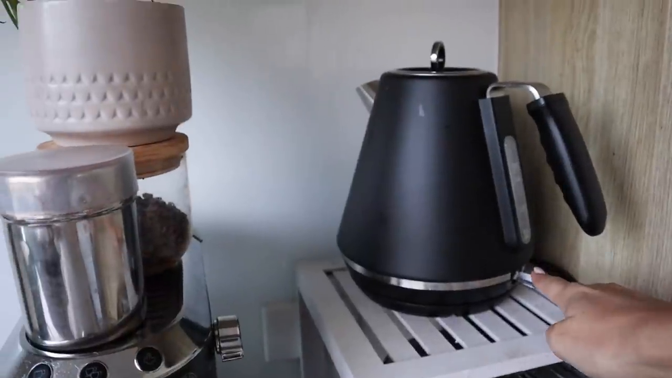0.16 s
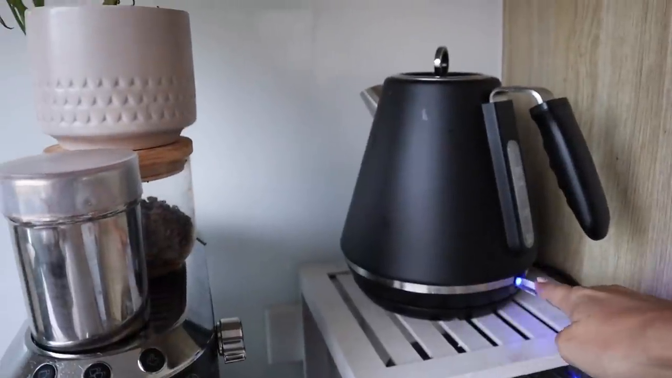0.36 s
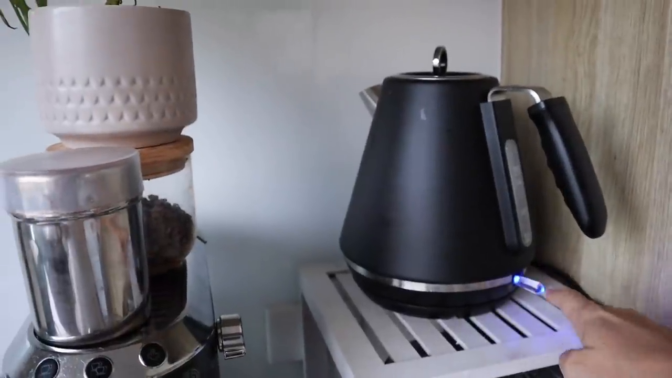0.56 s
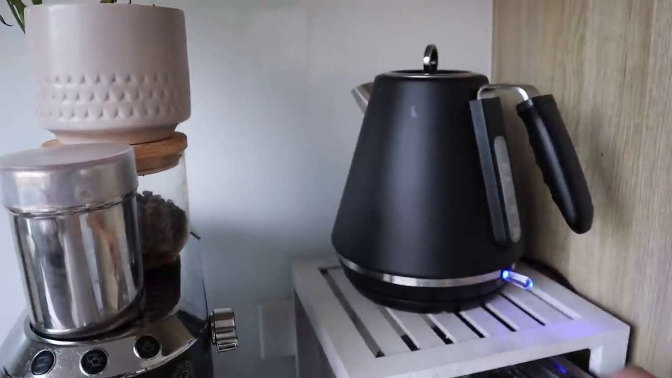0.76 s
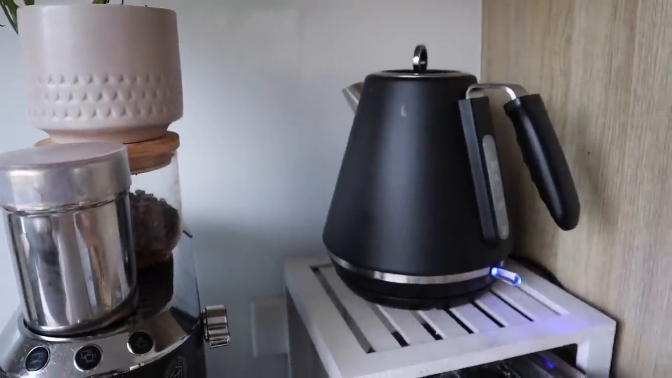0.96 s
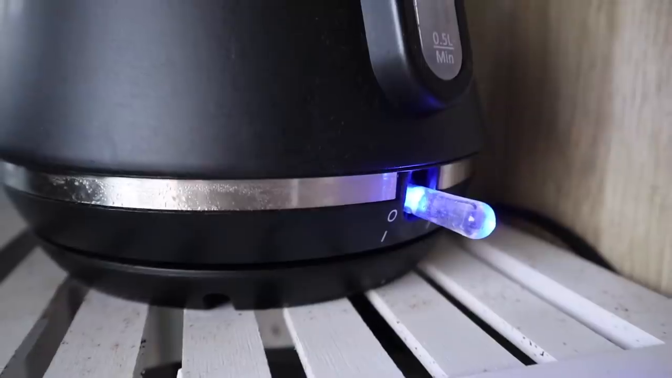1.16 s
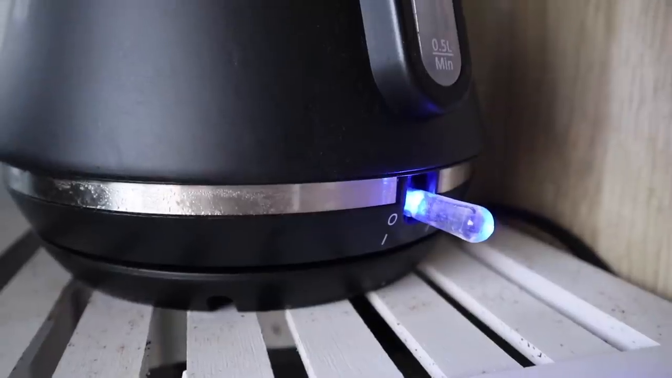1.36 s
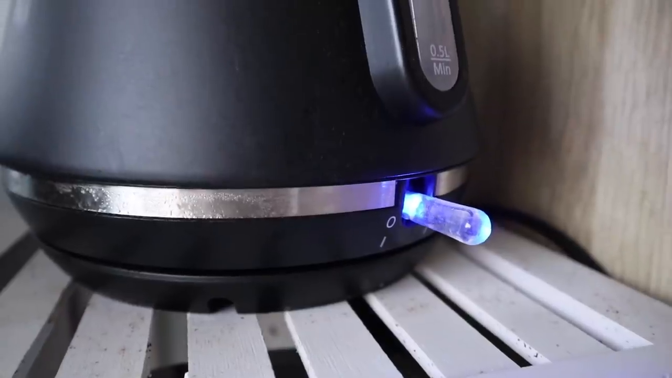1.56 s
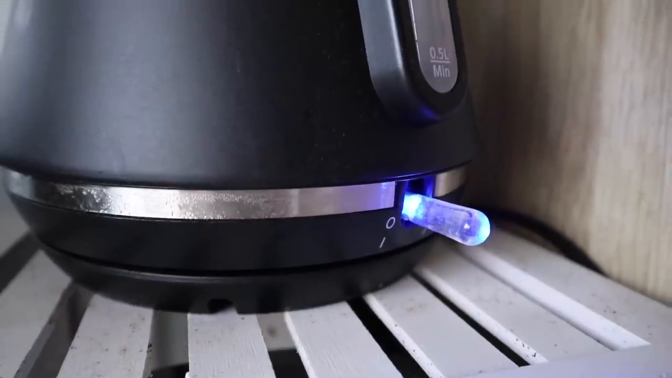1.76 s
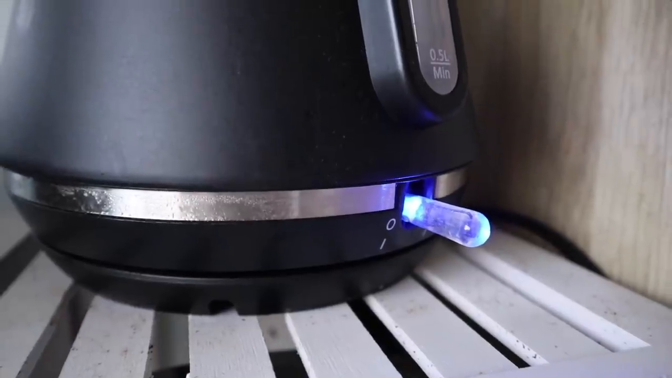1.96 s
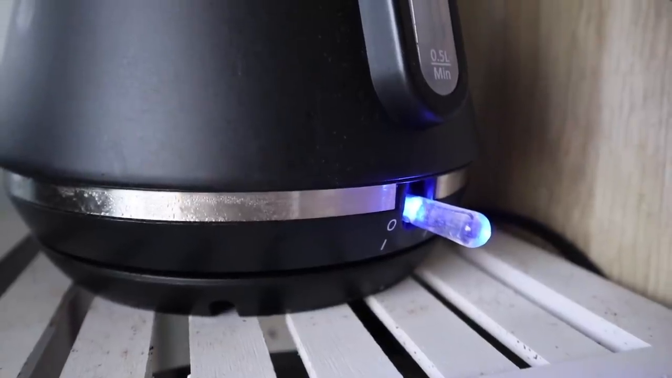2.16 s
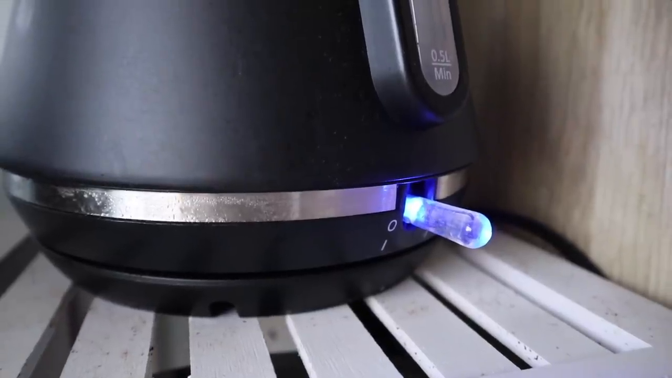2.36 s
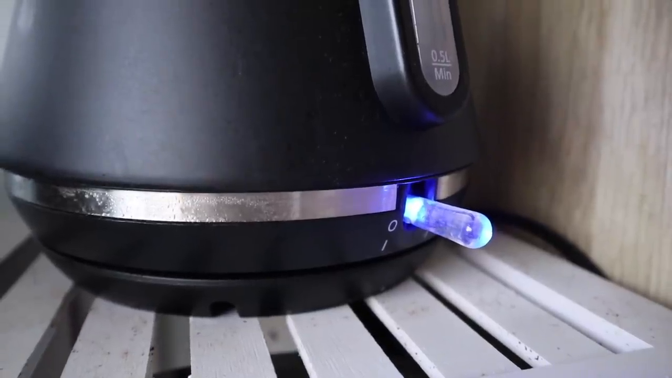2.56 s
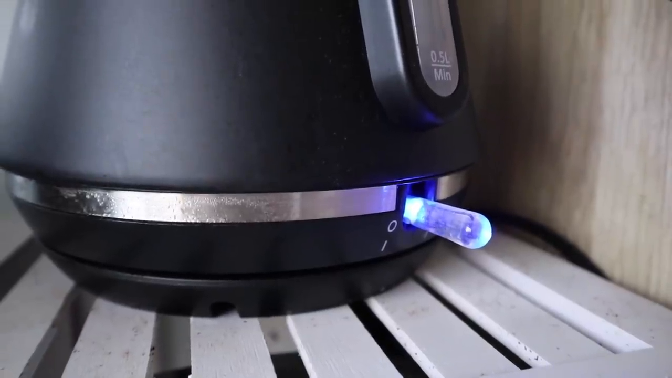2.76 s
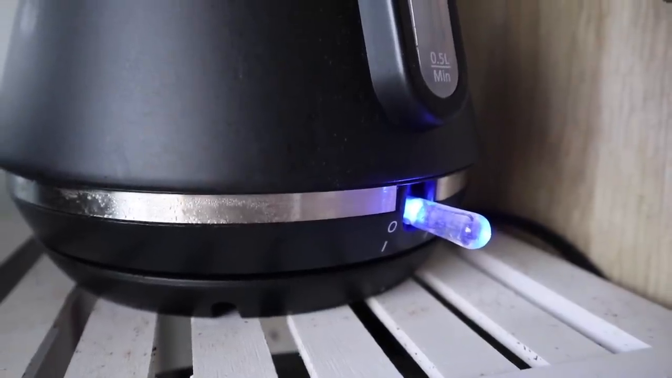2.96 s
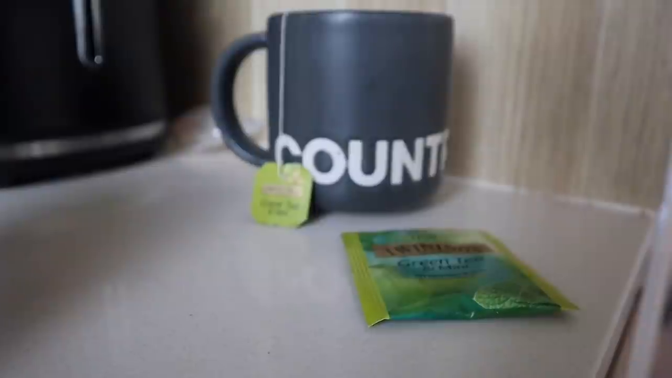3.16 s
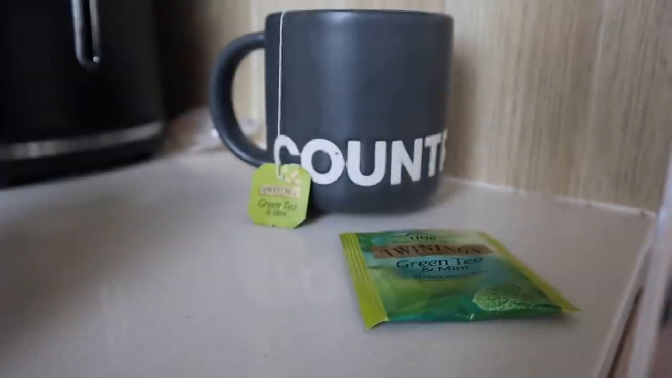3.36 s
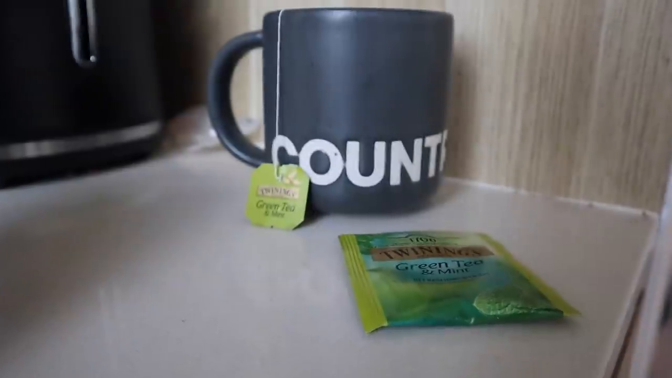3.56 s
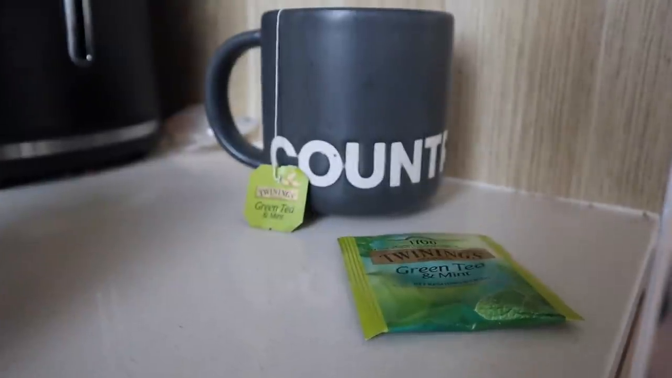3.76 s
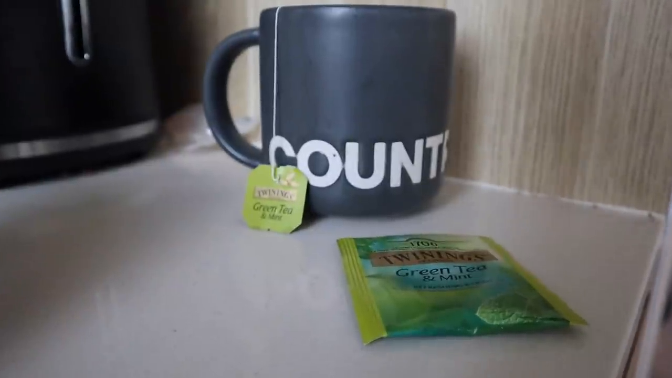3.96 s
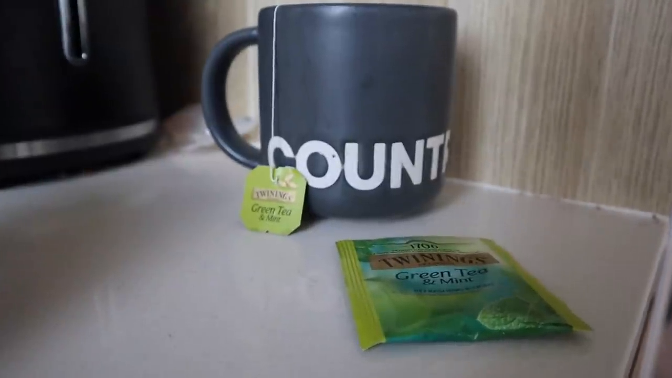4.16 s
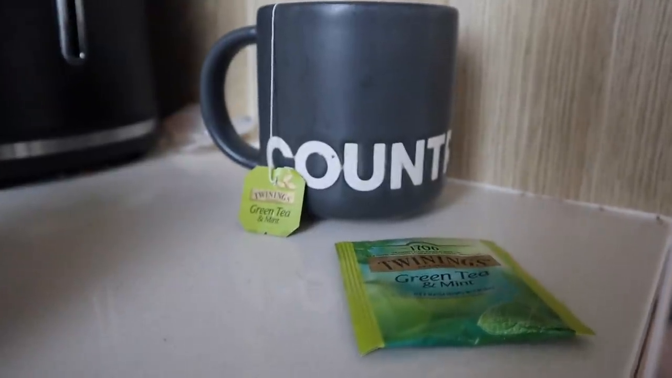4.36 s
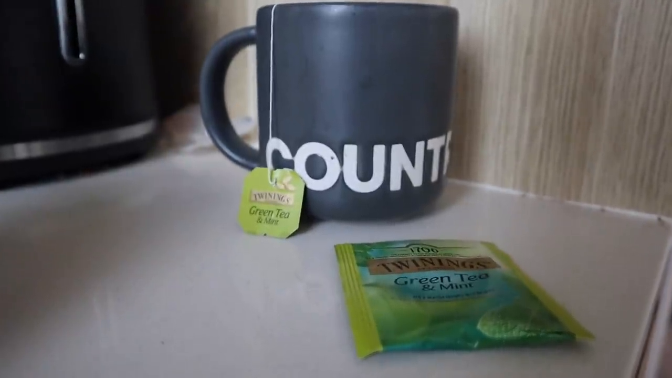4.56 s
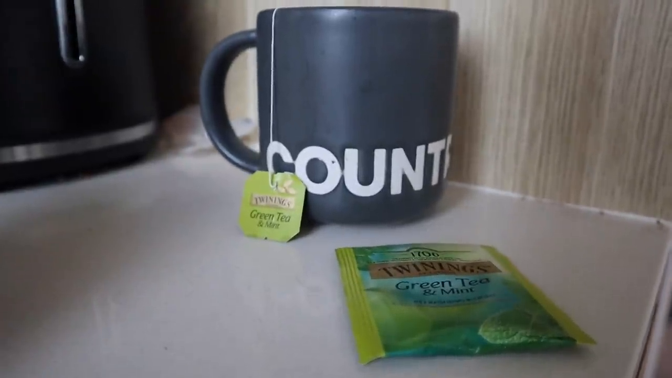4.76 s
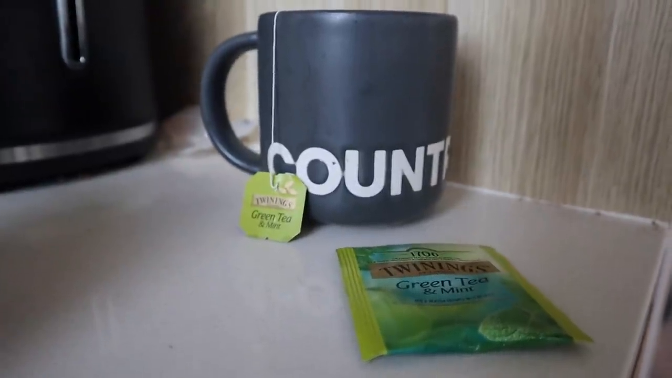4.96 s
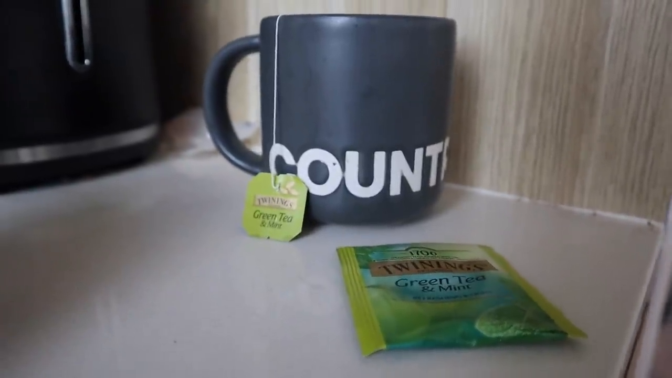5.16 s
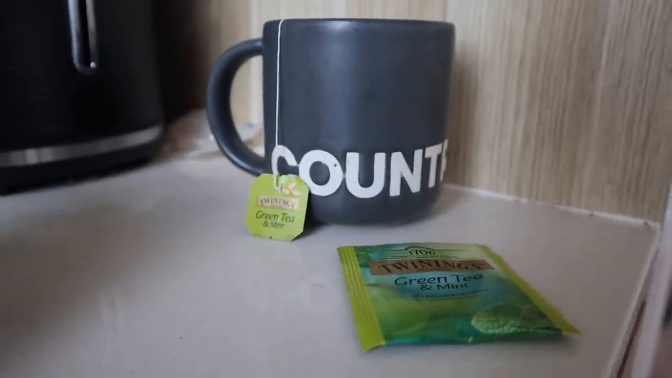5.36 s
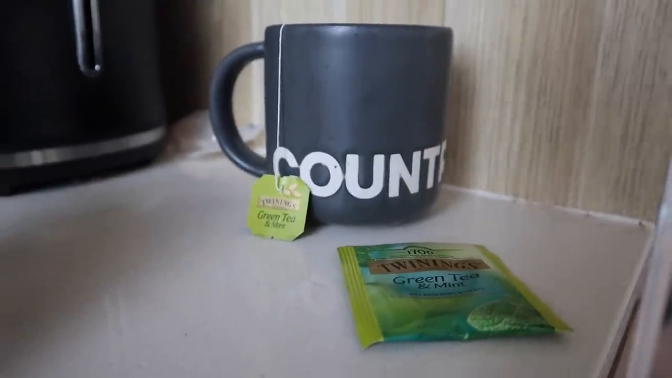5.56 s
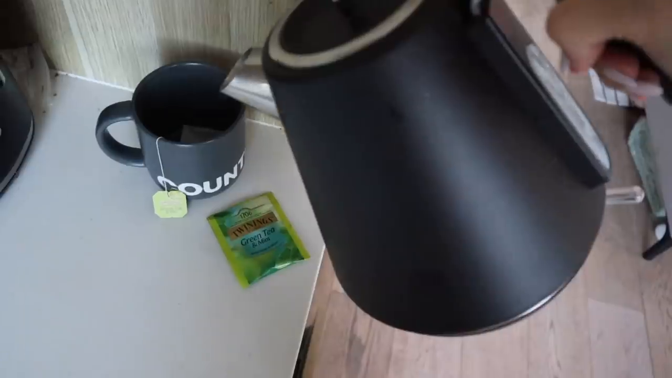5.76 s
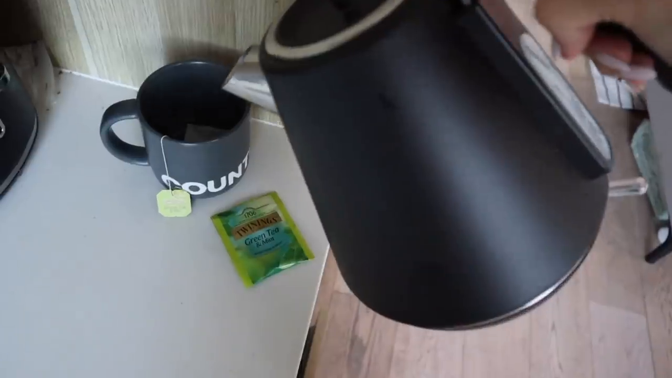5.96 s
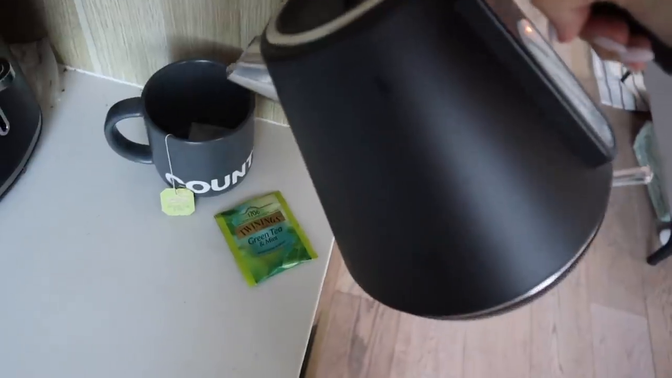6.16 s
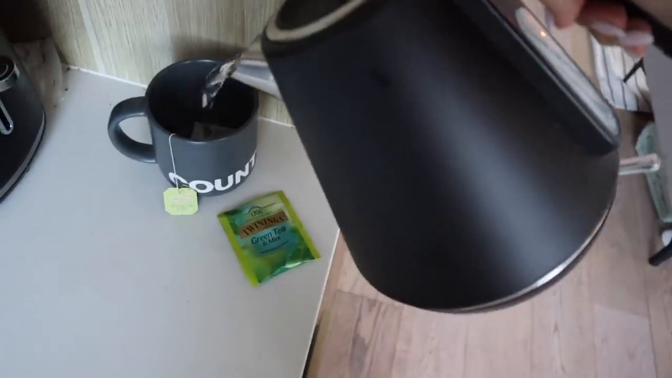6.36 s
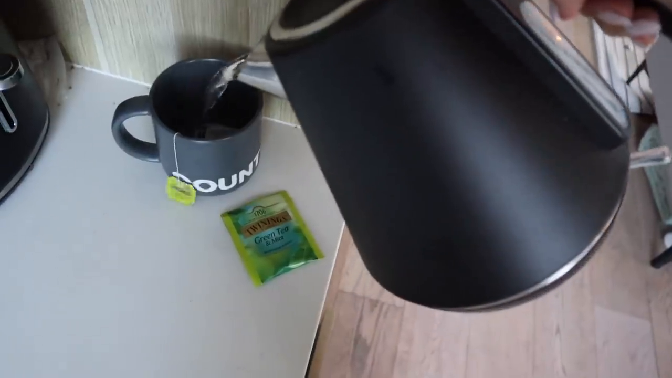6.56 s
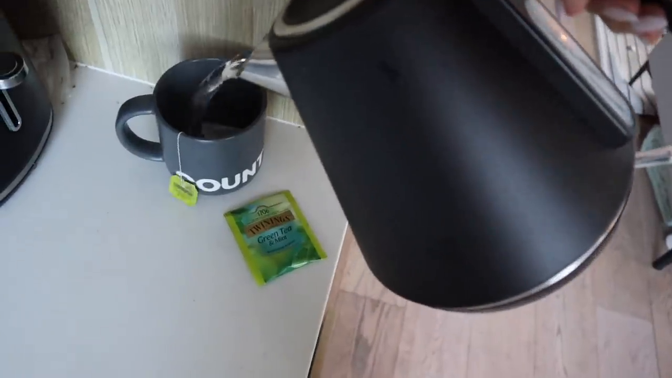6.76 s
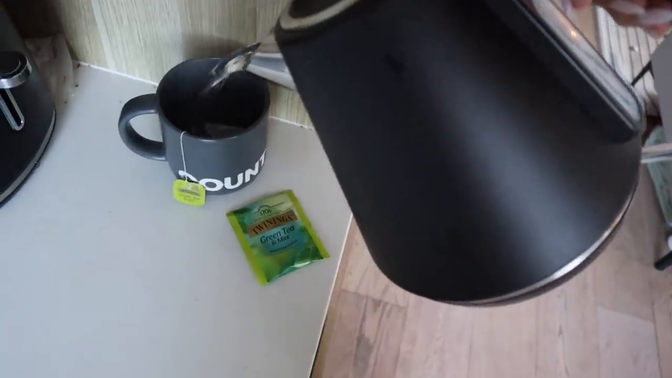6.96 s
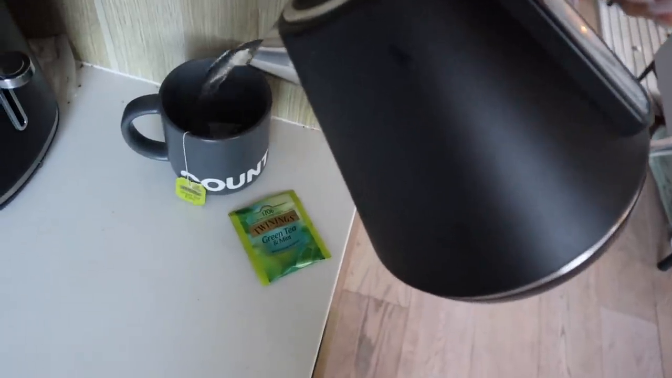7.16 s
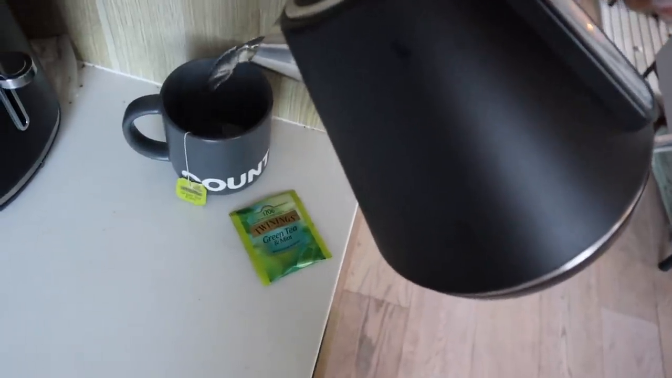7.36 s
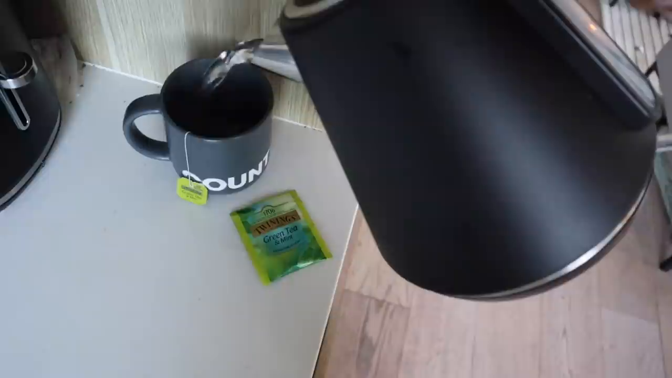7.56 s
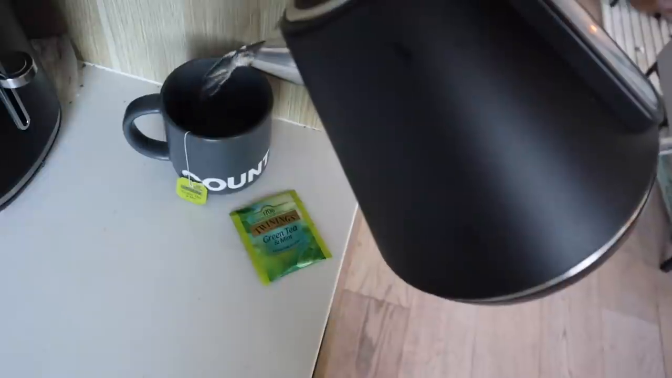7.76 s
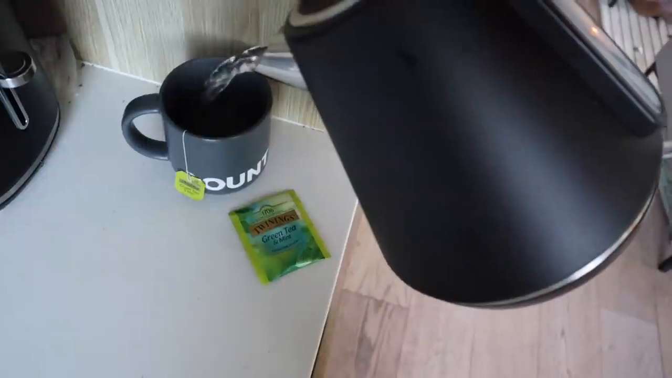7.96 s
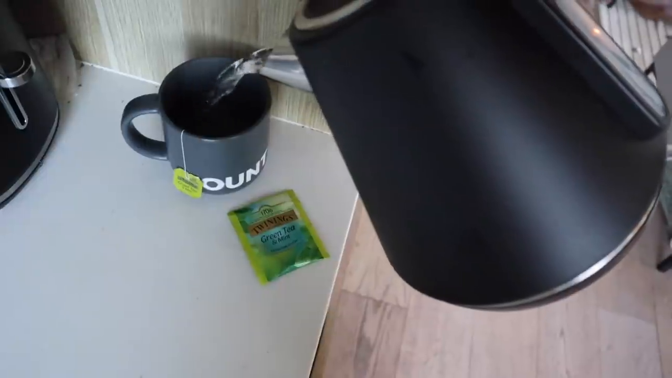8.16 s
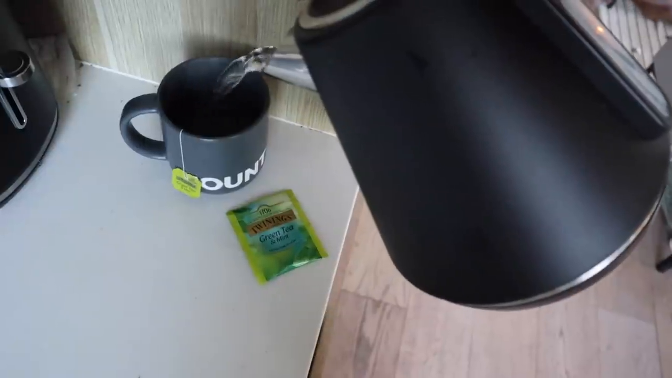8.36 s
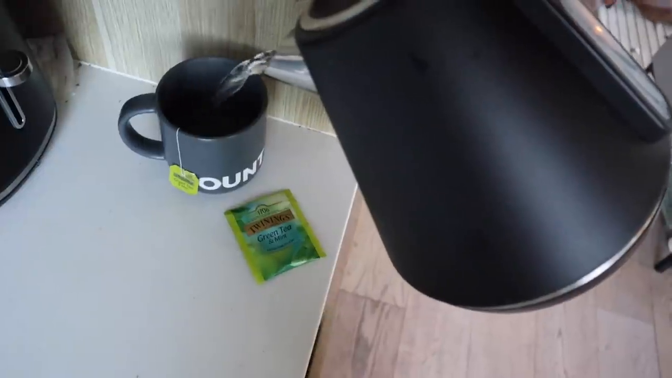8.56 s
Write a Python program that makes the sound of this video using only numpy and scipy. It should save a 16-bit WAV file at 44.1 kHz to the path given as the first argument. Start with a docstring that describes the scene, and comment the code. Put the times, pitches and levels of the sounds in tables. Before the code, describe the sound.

Soft room air and a very deep rumble lie under a quiet kitchen. From about 0.2 s a kettle lever creeps with tiny scrapes, then snaps loudly at 0.29 s, a hard crack with short hollow, metallic ringing; a faint contact follows at 0.37 s. At 1.04 s a close rush of heating water starts and swells until 3.1 s, grainy and hissing, with irregular dull thumps, the strongest near 3.0 s. At 3.12 s it changes abruptly to a duller, steady roar, farther off, which cuts out at 5.68 s. A low appliance hum remains, fullest around 6.35 s, with a barely audible whine. Light drips and splashes begin near 6.45 s; from 7.3 s water pours unevenly into a mug, bright slaps and fizz joined by increasingly full hollow plops and a faint clear ring. Lower gurgles enter at 8.5 s as it ends mid-pour.

```python
"""A kettle's switch creeps and scrapes, then snaps over loudly: each contact is a noise crack plus ringing tones.
Next, collapsing steam bubbles (random clicks and noise) ring the kettle in a growing rush, with dull thumps.
It is heard beside the switch, then abruptly from behind a mug, steady and duller, until it stops.
In the quiet kitchen an appliance hums; water drops into the mug, then pours, as noise slaps and ringing bubbles.
Soft room air and a deep rumble with a few low bumps lie under everything."""
import sys
import numpy as np
from scipy import signal
from scipy.fft import rfft, irfft, next_fast_len
from scipy.io import wavfile
from scipy.ndimage import uniform_filter1d, map_coordinates

SR = 44100
rng = np.random.default_rng(int(sys.argv[2]) if len(sys.argv) > 2 else 0)


def master(y):
    """Save y as 16-bit WAV."""
    cut = np.clip(np.atleast_2d(y).T, -1, 1)
    pcm = np.round(cut * 32767)  # scale
    wavfile.write(sys.argv[1], SR, pcm.astype(np.int16))


N = 379991
TIME = np.arange(N) / SR
TOP_HZ = 15900  # nothing sounds above this

# Colour tables give relative levels per hertz; resonances are bumps that stand on a colour.
# the rush by the switch and by the mug: colour [f/Hz, level/dB], resonances [f/Hz, width/Hz, height/dB]
COLOUR_NEAR = [(30, -34.5), (75, -10), (140, 0.5), (400, -7), (1000, -7), (2000, -12.5), (5600, -7.5),
               (6400, -10), (7700, -20), (8600, -9.5), (12000, -17.5), (15500, -27)]
RESONANCES_NEAR = [(169.5, 51, 7.7), (213, 71, 17.4), (492.8, 41, 16.3), (679.3, 48, 19), (783, 77, 12.1),
                   (1014, 67, 8.7), (1134, 76, 16.2), (1269.5, 87, 14.9), (1537, 175, 10.8), (2110, 340, 9),
                   (2684, 200, 13.5), (2990, 60, 8.8), (3137, 96, 7.5), (3275, 500, 7.8), (3881, 401, 5.0),
                   (4550, 510, 7.3), (5330, 514, 7.6), (6880, 135, 11.2), (7450, 100, 11.5),
                   (8100, 150, 9.6), (13014, 1106, 3.7), (14266, 495, 4.8)]
COLOUR_FAR = [(30, -32), (75, -7), (140, -2), (280, 5), (420, -11), (1000, -9), (2000, -12.5), (5600, -15),
              (6500, -24), (9500, -23.5), (12000, -29.5), (15500, -44.5)]
RESONANCES_FAR = [(173, 10.5, 9.5), (199, 80, 15.9), (344, 32, 5), (498, 28, 12.6), (681, 87, 13.8),
                  (734, 380, 1.2), (1119, 37, 8.2), (1266, 135, 15.3), (1910, 170, 4), (2470, 37, 4.9),
                  (3050, 67, 3.1), (3820, 27, 5.8), (4570, 160, 4.7), (5479, 160, 6.5), (9017, 370, 3.7)]
RUSH_START_S, MUG_SIDE_S, RUSH_STOP_S = 1.036, 3.119, 5.681  # begins, is heard from the mug, ends
# growth of thud, rush and hiss as the water warms [first level/dB, last level/dB, bend: over 1 = late]
WARMING_GROWTH = [(-37, -22.5, 0.63), (-31.5, -18, 0.72), (-32.5, -21.5, 0.57)]
# thud, rush and hiss once steady, heard from the mug [level/dB]
STEADY_DB = [-21.5, -20.5, -27]
# in warming, the deepest part of the thud loses this much and the part above it gains as much
THUD_LIFT_DB = 4
# single large bubbles that thump the base [t/s, level/dB, treble filter/dB]
BUBBLE_THUMPS = [(1.041, -33, -12), (1.185, -28, -13), (1.347, -21.5, -17), (1.456, -20, -13),
                 (1.657, -18.5, -12.5), (1.785, -23, 8), (1.895, -23.5, -4), (2.614, -18, -12.5),
                 (2.819, -18.5, -4.5), (3.018, -13.5, -6.5)]

# contacts of the switch lever [t/s, relative level/dB, treble up and bass down/dB, 60 dB scrape decay/s]
SWITCH_CONTACTS = [(.188, -33.5, 3.5, 0.1), (0.217, -37, 2, .05), (.241, -32, 2, 0.086),
                   (0.266, -36, 10, 0.099), (.27, -25.5, 5, 0.12), (0.283, -27.5, 1, .06),
                   (0.2891, 2.5, 4.5, 0.044), (0.2936, -2.5, -8, 0.034), (0.371, -25.5, -4, .03)]
# ringing tones of lever and kettle base [f/Hz, relative level/dB, 60 dB decay/s]
LEVER_TONES = [(168, -19, .16), (205, -21.5, .12), (388, -18.5, 0.055), (535, -5, 0.056), (787, 1, .04),
               (975, -6, .04), (1203, -3, 0.0435), (1800, -7, 0.038), (1930, -7, .035), (2264, -5.5, 0.038),
               (2500, -12.5, 0.017), (2960, -11, .03), (3500, -22.5, 0.033), (3850, -14, 0.0307),
               (5260, -26, 0.034), (7760, -20.5, .025), (7830, -33, .24)]
# colour of each contact's crack [f/Hz, level/dB]
CRACK_COLOUR = [(60, -50), (160, -23), (290, -28), (520, -5), (800, -3.5), (1460, -10.5), (2290, -11),
                (3170, -20), (4220, -24), (5380, -18), (6460, -36), (7760, -24), (15500, -30.5)]

# the largest gouts landing in the mug [t/s, plop level/dB, splash level/dB, splash f/Hz], levels before trim
LARGE_GOUTS = [(6.445, -51, -47.5, 3900), (6.536, -55, -38.5, 7740), (6.693, -61, -51, 8890),
               (6.766, -62.5, -51, 3850), (6.978, -58, -39.5, 2770), (7.04, -40.5, -49, 4690),
               (7.054, -50, -47.5, 9000), (7.203, -53, -46, 5960), (7.305, -53, -40.5, 3100),
               (7.33, -47, -46, 2600), (7.366, -35, -48, 2540), (7.422, -54, -43, 4050),
               (7.482, -53, -42, 8100), (7.546, -64, -46, 4200), (7.6, -63, -45, 3580),
               (7.65, -40, -39, 3550), (7.664, -43, -35.5, 3220), (7.734, -34, -40, 3000),
               (7.763, -35.5, -40, 2990), (7.813, -56, -34.5, 4280), (7.838, -34, -48, 4200),
               (7.943, -41.5, -48.5, 2990), (8.029, -39, -45, 7260), (8.112, -36, -52, 8030),
               (8.15, -34, -42.5, 4900), (8.192, -32.5, -31.5, 7950), (8.206, -37, -35.5, 9880),
               (8.253, -37.5, -39.5, 4000), (8.317, -35, -43, 4290), (8.382, -36.5, -50, 3270),
               (8.456, -37, -44.5, 3220), (8.491, -37.5, -50.5, 3100), (8.538, -34, -48, 4840),
               (8.594, -42, -37, 7840), (8.604, -35.5, -55, 7730)]
# colour of plops in the mug's hollow [f/Hz, level/dB]
HOLLOW_COLOUR = [(200, -50.5), (550, -11.5), (800, -3.5), (1100, -4.5), (1350, -1.5), (1700, -4.5),
                 (2050, -21), (3200, -37)]
# air resonances of the mug [f/Hz, width/Hz, height/dB]
MUG_RESONANCES = [(840, 34, 3.5), (1044, 27, 6), (1132, 53, 8), (1442, 80, 5), (1720, 75, 4.5)]
# colour of splashes over the rim [f/Hz, level/dB]
SPLASH_COLOUR = [(200, -47), (900, -14), (1500, -9), (2350, -15.5), (3050, -1.5), (3700, -3.5),
                 (4500, -1.5), (5300, -5.5), (6600, -6), (8100, 1), (8900, -5.5), (9800, -3), (11000, -9),
                 (12500, -4.5), (15500, -11.5)]
# strength of the stream, from dribble to pour [t/s, level/dB]
STREAM_FLOW = [(6.9, -14), (7.28, -11), (7.34, 3), (7.59, -7), (7.7, 2), (7.91, -0.5), (8.22, 2.5),
               (8.52, -4.5), (8.58, 2.5)]
# gushes that set off a clear ring in the mug [t/s, level/dB]
MUG_RINGS = [(7.055, -56), (7.305, -41.5)]
POOL_S, SHALLOW_DB, FILL_S = 7.3, -14, 0.38  # pool forms; bubbling starts weaker by this; time scale of growth
# starting pitch of a gout's trapped bubble in a full and a shallow pool; random scatter as a share
PLOP_HZ, PLOP_SHALLOW_HZ, PLOP_SPREAD = 1080, 935, 0.043
# decay of kitchen echo [f/Hz, 60 dB decay/s]
KITCHEN_DECAY = [(150, 0.39), (1000, 0.41), (4000, 0.29), (12000, 0.13)]

# colour of the quiet room's air [f/Hz, level/dB]
AIR_COLOUR = [(12, -36.5), (20, -3.5), (76, -16), (161, -17.5), (196, -11), (259, -17.5), (289, -11.5),
              (404, -15), (519, -17.5), (834, -19), (1130, -23), (1670, -30), (15500, -40.5)]
# colour of the appliance's soft rush [f/Hz, level/dB]
DRONE_COLOUR = [(70, -29), (130, -6.5), (280, 3.5), (450, -1), (850, -10.5), (1500, -7.5), (2500, -21.5)]
# the appliance hum swells and fades; it also wavers around this level
HUM_PEAK_S, HUM_DB, HUM_RISE_DB_PER_S, HUM_FALL_DB_PER_S = 6.35, -51.5, 30, 7
# deep rumble by the switch, by the mug and after the rush [level/dB]
RUMBLE_LEVELS_DB = [-57, -52, -63]
# short low bumps [t/s, peak level/dB]
LOW_BUMPS = [(1.31, -38), (3.119, -41), (8.56, -46)]
BUMP_S = 0.031  # from a bump's peak until its level is down to 1/e


def amp(db):
    """Turn decibels into gain."""
    return 10 ** (np.asarray(db) / 20)


def unit(x):
    """Scale x to an average strength (rms) of 1."""
    return x / np.sqrt(np.mean(x ** 2) + 1e-20)


def loudness(x):
    """Rms of a short sound over its first 12 ms."""
    return np.sqrt(np.mean(x[:round(.012 * SR)] ** 2))


def along(points, hz):
    """Read a (Hz, value) curve on a log frequency axis."""
    f, v = np.transpose(points)
    return np.interp(np.log(hz + 1), np.log(f + 1), v)


def wobble(rate):
    """A smooth random curve with rate knots a second."""
    return map_coordinates(rng.standard_normal(int(N * rate / SR) + 4), [TIME * rate])


def between(t0, t1):
    """1 from t0 to t1, else 0, with quick edges."""
    return uniform_filter1d(((TIME >= t0) & (TIME < t1)) * 1., size=90)


def add(track, s, sound):
    """Mix a sound into the track at time s."""
    part = track[round(s * SR):][:len(sound)]
    part += sound[:len(part)]


def coloured(x, spectrum, peaks=()):
    """Filter x to a broad colour with ringing peaks on it, without sounding ahead of x."""
    m = 2 * next_fast_len(len(x) // 2 + 4096)
    hz = np.fft.rfftfreq(m, 1 / SR)
    db = along(spectrum, hz)
    db = db + sum(height / (1 + (2 * (hz - centre) / width) ** 2) for centre, width, height in peaks)
    # folding the cepstrum gives minimum phase: the filter acts as early as it can
    cepstrum = irfft(np.log(amp(db)))
    cepstrum[1:m // 2] *= 2
    cepstrum[m // 2 + 1:] = 0
    response = np.exp(rfft(cepstrum))
    return irfft(rfft(x, m) * response, m)[:len(x)]


def band(x, lo_hz, hi_hz):
    """Keep the part of x between two frequencies."""
    edges = [lo_hz, min(hi_hz, SR / 2 - 1)]
    return signal.sosfilt(signal.butter(4, edges, "band", fs=SR, output="sos"), x)


def pops(rate, spread_db):
    """Clicks at random times, rate a second on average, with sizes scattered in dB."""
    happens = rng.random(N) < rate / SR
    return happens * rng.choice([-1, 1], N) * amp(spread_db * rng.standard_normal(N))


def room(x, wet_db):
    """Add the kitchen's echo: noise in which each frequency dies at its own speed."""
    hz, t, z = signal.stft(rng.standard_normal(SR // 2), SR, nperseg=256)
    decay = amp(-60 * t / along(KITCHEN_DECAY, hz)[:, None])
    tail = signal.istft(z * decay, SR, nperseg=256)[1]
    tail = np.pad(tail, (130, 0))  # the echo starts about 3 ms late
    return x + amp(wet_db) * signal.fftconvolve(x, tail / np.linalg.norm(tail))[:len(x)]


def heating(levels_db, lift_db, spectrum, body, rate, spread_db, flutter_db, thud_flutter_db):
    """Collapsing steam bubbles ring the kettle: few large ones thud, many small ones hiss."""
    thud_db, rush_db, hiss_db = levels_db
    collapses = unit(pops(rate, spread_db)) + .5 * rng.standard_normal(N)
    collapses = coloured(collapses, spectrum, body)
    fine = unit(pops(rate * 6, spread_db)) + 0.8 * rng.standard_normal(N)
    fine = coloured(fine, spectrum, body)
    surge = wobble(21.98)  # bubbles leave the base in clusters
    low = band(collapses, 104, 417)
    deep = signal.sosfiltfilt(signal.butter(4, 195, fs=SR, output="sos"), low)
    thud = unit(amp(-lift_db) * deep + amp(lift_db) * (low - deep))
    thud = amp(thud_db + thud_flutter_db * surge) * thud
    rush = amp(rush_db + flutter_db * surge) * unit(band(collapses, 386, 1864))
    hiss = amp(hiss_db + 0.37 * flutter_db * surge) * unit(band(fine, 2000, 17500))
    return thud + rush + room(hiss, wet_db=-10.5)


def thumps():
    """A large bubble gives the base one blow, mostly a dull one."""
    out = np.zeros(N)
    ring = coloured(signal.unit_impulse(SR // 4), COLOUR_NEAR, RESONANCES_NEAR)
    for s, db, treble_db in BUBBLE_THUMPS:
        tone = [(70, -20), (160, 1), (300, -7), (2200, treble_db), (4500, treble_db - 14)]
        blow = coloured(ring, tone)
        add(out, s, amp(db) * blow / loudness(blow))
    return out


def kettle():
    """The bubbling rush grows as the water warms, then holds steady as heard from the mug."""
    warmth = np.clip((TIME - RUSH_START_S) / (MUG_SIDE_S - RUSH_START_S), 0, 1)
    growing_db = [first + (last - first) * warmth ** bend for first, last, bend in WARMING_GROWTH]
    near = heating(growing_db, THUD_LIFT_DB * (warmth - .5), COLOUR_NEAR, RESONANCES_NEAR,
                   rate=700, spread_db=3.5, flutter_db=0.57, thud_flutter_db=1.55)
    far = heating(STEADY_DB, 0, COLOUR_FAR, RESONANCES_FAR,
                  rate=3000, spread_db=2.0, flutter_db=0.65, thud_flutter_db=1.23)
    near = (near + thumps()) * between(RUSH_START_S, MUG_SIDE_S)
    return near + far * between(MUG_SIDE_S, RUSH_STOP_S)


def switch(ring_db=-2, crack_db=-4, tail_db=-27, tail_t60=0.39):
    """Each contact of the lever cracks and rings the kettle's base; counter and walls scatter the sound."""
    out, t = np.zeros(N), np.arange(SR // 2) / SR
    ring = np.zeros(len(t))
    for k, (hz, level, t60) in enumerate(LEVER_TONES):
        ring += (-1) ** k * amp(level - 60 * t / t60) * np.sin(2 * np.pi * hz * t)
    ring = amp(ring_db) * ring / np.abs(ring).max()
    surfaces = [(522, 110, 7.0), (1180, 290, 11.5), (2240, 260, 5.1)]
    for s, db, bright_db, scrape in SWITCH_CONTACTS:
        crack = unit(coloured(rng.standard_normal(len(t)), CRACK_COLOUR))
        crack = crack * amp(crack_db - 60 * t / scrape) / 2
        scatter = unit(coloured(rng.standard_normal(len(t)), CRACK_COLOUR, surfaces))
        contact = ring + crack + scatter * amp(tail_db - 60 * t / tail_t60)
        tilt = [(70, -28), (140, -bright_db), (550, -bright_db), (2500, bright_db)]
        add(out, s, amp(db) * coloured(contact, tilt))
    return out


def flow_db(s):
    """Strength of the stream at time s."""
    return np.interp(s, *np.transpose(STREAM_FLOW))


def shallow(s):
    """1 in the empty mug, falling to 0 as the pool deepens and the water drags more air under."""
    return np.exp(-np.maximum(s - POOL_S, 0) / FILL_S)


def bubble(hz, cycles, rise=0.072):
    """A trapped air bubble rings, falling 60 dB in the given cycles of hz while its pitch rises."""
    u = np.arange(SR // 20) / SR * hz / cycles  # reaches 1 after the given cycles
    tone = np.sin(2 * np.pi * cycles * u * (1 + rise * np.minimum(u, 2) / 2))
    return tone * amp(-60 * u)


def froth(hz, spread, cycles, spread_db, count):
    """Bubbles of random size and pitch all through the pour."""
    out, start = np.zeros(N), STREAM_FLOW[0][0]
    times, sizes = rng.uniform(start, N / SR, count), rng.uniform(-0.67, 1, count)
    for when, size, pitch in zip(times, sizes, rng.standard_normal(count)):
        tone = bubble(min(hz * np.exp(spread * pitch), TOP_HZ), cycles)
        add(out, when, amp(spread_db * size) * tone)
    return out


def gout(s, plop_db, splash_db, splash_hz, slosh=0.81, slosh_t60=0.059, slap_t60=0.011,
         spray=0.094, spray_t60=0.078, ping=0.31):
    """A gout landing at time s slaps the surface, throws spray, and traps a large bubble and a tiny one."""
    t = np.arange(SR // 20) / SR
    plop_hz = PLOP_HZ + (PLOP_SHALLOW_HZ - PLOP_HZ) * shallow(s)
    large = bubble(plop_hz * np.exp(PLOP_SPREAD * rng.standard_normal()), cycles=16, rise=0.11)
    sloshing = slosh * rng.standard_normal(len(t)) * amp(-60 * t / slosh_t60)
    plop = coloured(large + sloshing, HOLLOW_COLOUR, MUG_RESONANCES)
    droplets = rng.standard_normal(len(t)) ** 3  # cubing makes the noise spiky
    slap = rng.standard_normal(len(t)) * amp(-60 * t / slap_t60)
    slap = slap + spray * droplets * amp(-60 * t / spray_t60)
    slap = coloured(slap, SPLASH_COLOUR, [(splash_hz, 1.1 * splash_hz, 9)])
    tiny = bubble(splash_hz, cycles=49, rise=0.038)
    pitched = ping * (5000 / splash_hz) ** 2  # the larger the bubble, the more its ring stands out
    splash = slap / loudness(slap) + pitched * tiny / loudness(tiny)
    return amp(plop_db) * plop / loudness(plop) + amp(splash_db) * splash / loudness(splash)


def drops(plop_trim_db=1, splash_trim_db=-1):
    """The large gouts plop and splash, each at its own moment."""
    out = np.zeros(N)
    for s, plop_db, splash_db, splash_hz in LARGE_GOUTS:
        add(out, s, gout(s, plop_db + plop_trim_db, splash_db + splash_trim_db, splash_hz))
    return out


def patter(plop_db=-44, splash_db=-45.0, splash_hz=6200, scatter_db=1.5, count=26):
    """Smaller gouts break off the stream at uneven intervals and follow its strength."""
    out, step = np.zeros(N), (N / SR - POOL_S) / count
    for k, (late, low, high, pitch) in enumerate(rng.uniform(-1, 1, (count, 4))):
        s = POOL_S + step * (k + (1 + late) / 2)
        low_db = plop_db + SHALLOW_DB * shallow(s) + scatter_db * low
        high_db = splash_db + scatter_db * high
        add(out, s, amp(flow_db(s)) * gout(s, low_db, high_db, splash_hz * np.exp(.6 * pitch)))
    return out


def stream(bubbles_db=-47.0, spatter_db=-52.0, wash=0.26, clump_db=2.0):
    """The wavering stream churns bubbles in the mug's hollow and fizzes in clumps with tiny ones."""
    pouring = TIME > STREAM_FLOW[0][0]
    churn = froth(hz=1150, spread=0.29, cycles=14, spread_db=4, count=240)
    churn = coloured(churn, HOLLOW_COLOUR, MUG_RESONANCES)
    fizz = froth(hz=5560, spread=0.613, cycles=21, spread_db=10, count=900)
    fizz = fizz / np.std(fizz[pouring]) + wash * unit(pops(rate=1200, spread_db=5))
    fizz = coloured(fizz * amp(clump_db * wobble(35)), SPLASH_COLOUR)
    churn = amp(bubbles_db + SHALLOW_DB * shallow(TIME)) * churn / np.std(churn[pouring])
    fizz = amp(spatter_db) * fizz / np.std(fizz[pouring])
    return amp(flow_db(TIME)) * (churn + fizz) * pouring


def gurgle(start=8.5, hz=460, db=-35, count=9):
    """Late in the pour, the stream drags down large, low bubbles."""
    out = np.zeros(N)
    for when, pitch in zip(np.linspace(start, N / SR, count), rng.standard_normal(count)):
        tone = bubble(hz * np.exp(.2 * pitch), cycles=24)
        add(out, when + rng.normal(0, 0.00427), amp(db) * tone)
    return out


def mug_ring(hz=2502, t60=0.54):
    """One clear, slowly dying tone hangs on after two early gushes."""
    out, t = np.zeros(N), np.arange(SR // 2) / SR
    for s, db in MUG_RINGS:
        add(out, s, amp(db - 60 * t / t60) * np.sin(2 * np.pi * hz * t))
    return out


def background(air_db=-50.0, drone_db=-56, whine_db=-76, whine_hz=3268, hum_hz=71.0):
    """Room air is soft noise; after the rush an appliance hums, drones and whines faintly."""
    air = amp(air_db) * unit(coloured(rng.standard_normal(N), AIR_COLOUR))
    rising_db = HUM_RISE_DB_PER_S * (TIME - HUM_PEAK_S)
    falling_db = HUM_FALL_DB_PER_S * (HUM_PEAK_S - TIME)
    hum_db = HUM_DB + np.minimum(rising_db, falling_db) + wobble(4)
    hum = amp(hum_db) * unit(np.sin(2 * np.pi * hum_hz * TIME + 0.84 * wobble(8)))
    drone = amp(drone_db) * unit(coloured(rng.standard_normal(N), DRONE_COLOUR, [(291, 29, 6.5)]))
    whine = amp(whine_db) * unit(np.sin(2 * np.pi * whine_hz * TIME + 1.3 * wobble(26)))
    return air + (hum + drone + whine) * (TIME > RUSH_STOP_S)


def rumble_and_bumps():
    """Very low noise rumbles at three levels in turn, with a few short low bumps."""
    level = amp(RUMBLE_LEVELS_DB)[np.searchsorted([MUG_SIDE_S, RUSH_STOP_S], TIME)]
    rumble = level * unit(band(rng.standard_normal(N), 22.5, 44.4))
    swells = sum(amp(db) * np.exp(-((TIME - s) / BUMP_S) ** 2) for s, db in LOW_BUMPS)
    return rumble + swells * unit(band(rng.standard_normal(N), 25, 94))


def scene():
    """Mix the kettle, the switch and the pour over the background."""
    pour = room(drops() + patter() + stream() + gurgle(), wet_db=-9) + mug_ring()
    return (kettle() + switch() + pour + background() + rumble_and_bumps())[None]


def record(dry):
    """Round off peaks near full scale, then remove everything from TOP_HZ up."""
    held = dry / (1 + np.abs(dry) ** 8) ** (1 / 8)
    m = next_fast_len(N + SR // 2)
    keep = np.fft.rfftfreq(m, 1 / SR) < TOP_HZ
    return irfft(rfft(held, m) * keep, m)[..., :N]


dry = scene()
out = record(dry)
master(out)
```